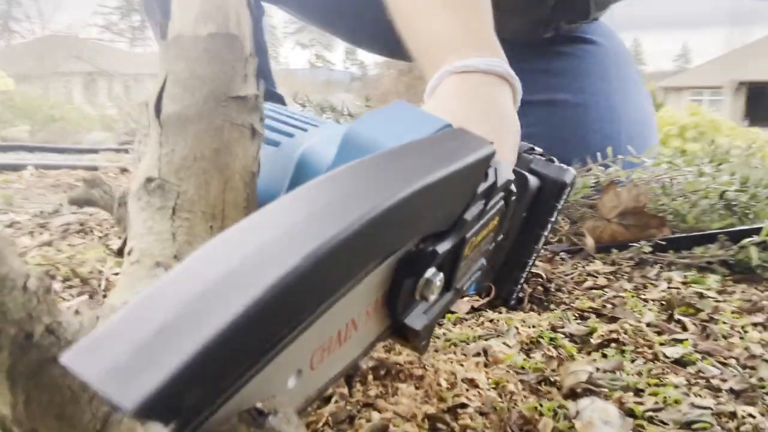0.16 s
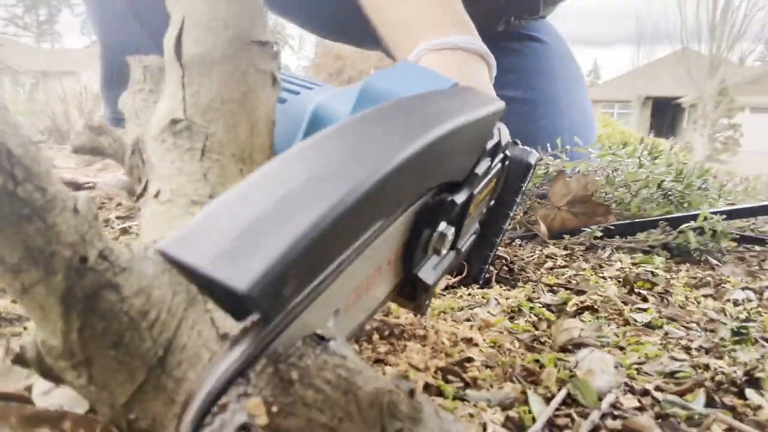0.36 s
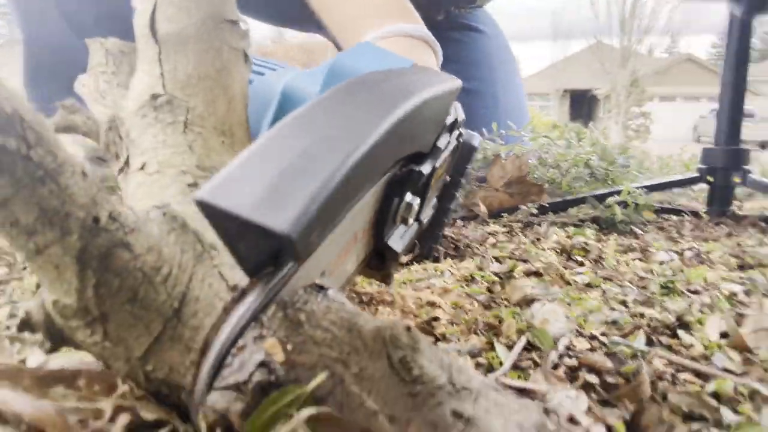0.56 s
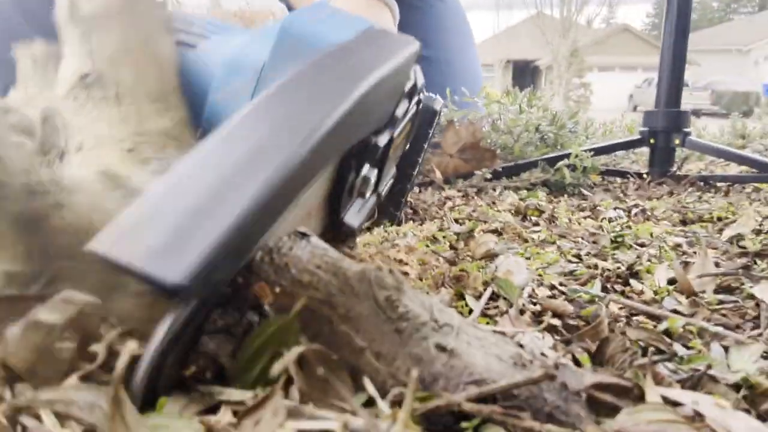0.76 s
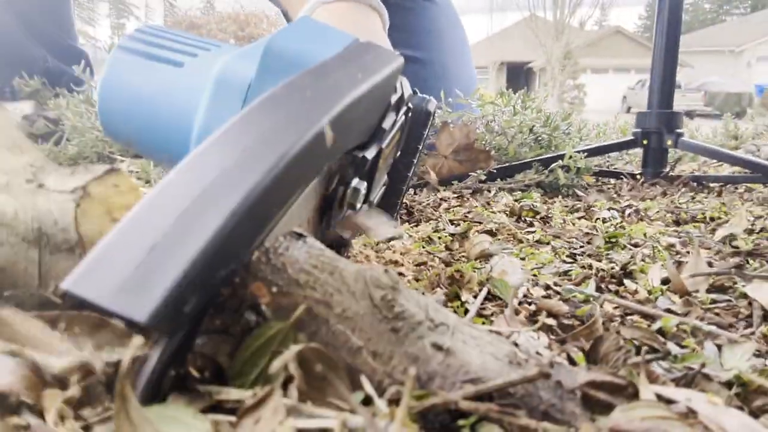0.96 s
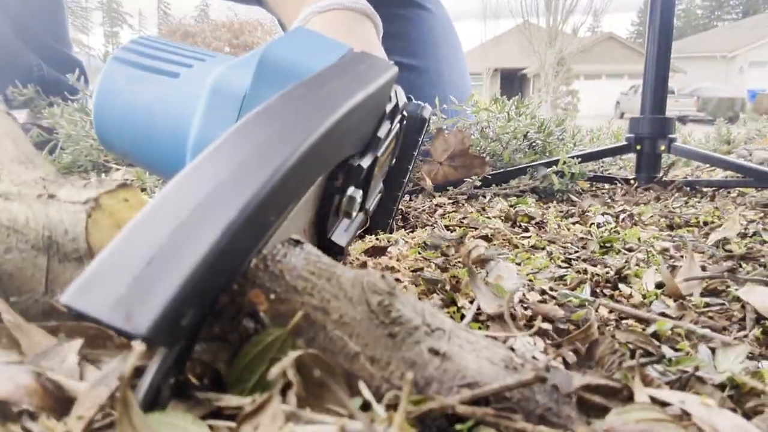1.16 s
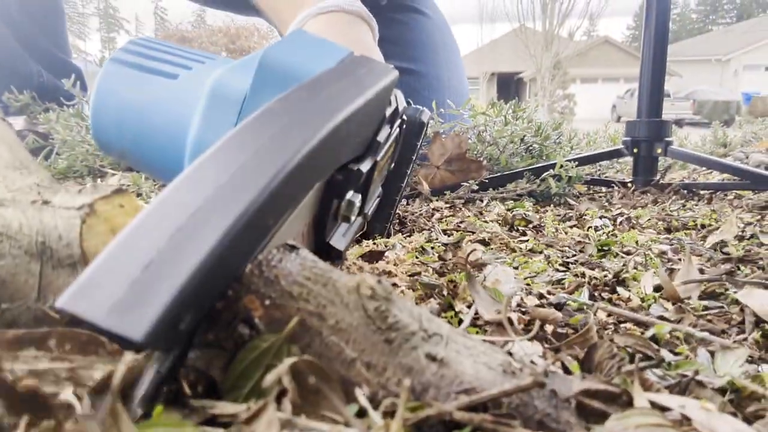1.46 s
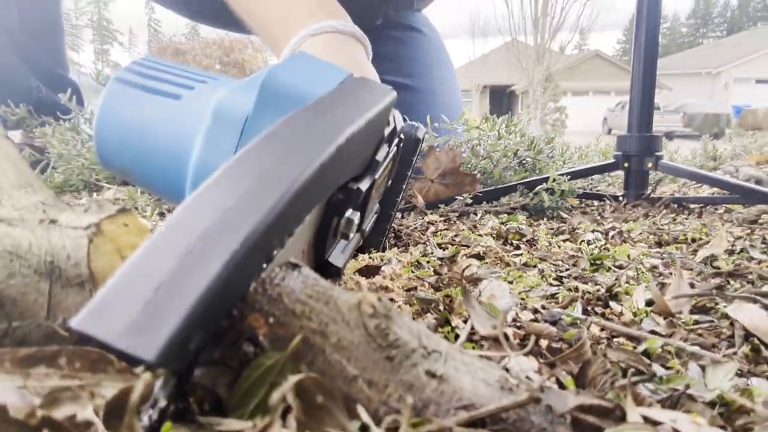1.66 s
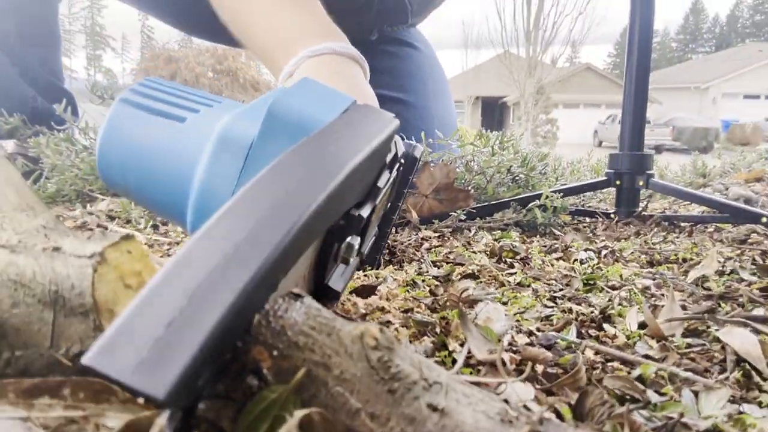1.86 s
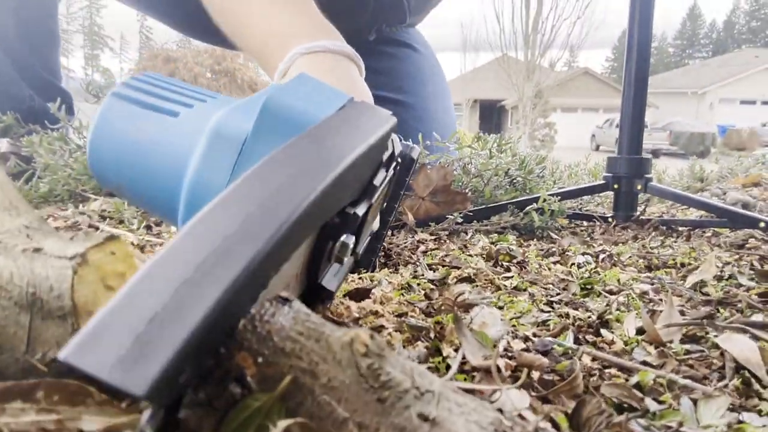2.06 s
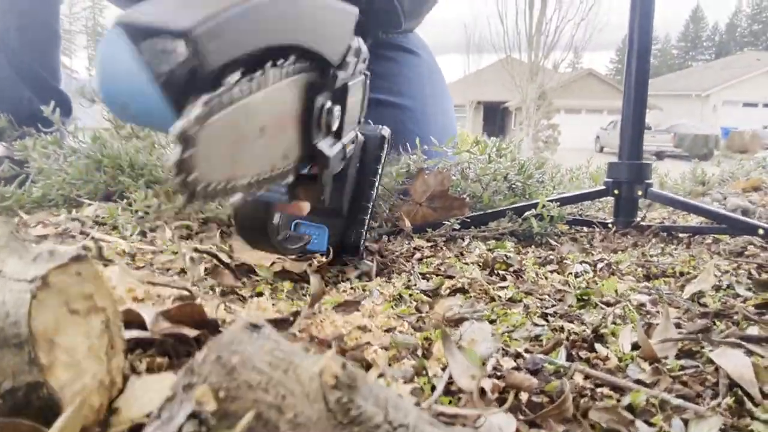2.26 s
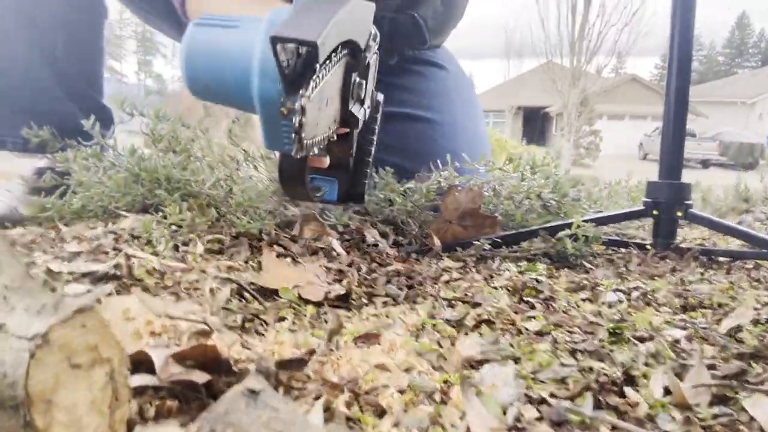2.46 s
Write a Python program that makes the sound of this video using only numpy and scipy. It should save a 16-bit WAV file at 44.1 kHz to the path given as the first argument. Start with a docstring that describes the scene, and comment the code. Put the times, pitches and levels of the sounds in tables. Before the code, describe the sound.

A small battery chainsaw runs very close outdoors, a dense chain rasp with whine and loose guard rattle. Around 0.7-0.85 s the teeth grab: woody thumps, cracks and judder, the pitch dipping then recovering higher. It whines freely until 1.5 s, slows rapidly and clacks silent near 1.65 s. Quiet leaf rustles, gritty scrapes and twig ticks follow, sharpest near 2.24 s, over faint low air.

```python
"""Small chainsaw cutting a dead branch

A cordless chainsaw runs close by, low over dry leaves: link slaps merge into a rasp, sprocket and motor
whine as sines tied to chain speed, and the loose guard rattles as ringing modes.
As the teeth grab, modal thumps, cracks and judder sound and the speed dips; breaking through recolours the rasp.
The chain slows and falls silent; filtered specks and noise bursts make leaves, scrapes and twigs over faint air.
"""
import sys
import numpy as np
from scipy import signal
from scipy.fft import rfft, irfft, next_fast_len
from scipy.io import wavfile
from scipy.ndimage import map_coordinates

SR = 44100
rng = np.random.default_rng(int(sys.argv[2]) if len(sys.argv) > 2 else 0)


def wav_record(signal):
    """Record a signal, one row per channel, as 16-bit PCM in the file named by sys.argv[1]."""
    frames = np.transpose(np.atleast_2d(signal))
    bounded = np.clip(frames, -1, 1)
    # unit amplitude maps onto the largest positive 16-bit level
    quanta = np.round(bounded * 32767).astype(np.int16)
    wavfile.write(sys.argv[1], SR, quanta)


N = 114660


def amp(db):
    """Amplitude of a level in dB."""
    return 10 ** (np.asarray(db) / 20)


def unit(x):
    """Scale to rms 1."""
    return x / np.sqrt(np.mean(x ** 2) + 1e-20)


def along(points, hz):
    """Each column of (frequency [Hz], ..) points, interpolated on a log frequency axis."""
    f, *cols = np.transpose(points)
    return np.array([np.interp(np.log(hz + 1), np.log(f + 1), c) for c in cols])


def curves(rows):
    """One value per sample for each column after the time."""
    s, *cols = np.transpose(rows)
    return [np.interp(np.arange(N) / SR, s, c) for c in cols]


def wobble(knots_per_s):
    """A smooth random curve through normal-distributed knots."""
    position = np.arange(N) * knots_per_s / SR
    return map_coordinates(rng.standard_normal(N), [position], mode="wrap")


def filtered(x, response):
    """x times a response of frequency, via a zero-padded FFT."""
    m = next_fast_len(N + SR // 2)
    return irfft(rfft(x, m) * response(np.fft.rfftfreq(m, 1 / SR)), m)[..., :N]


# left-right likeness: (frequency [Hz], correlation [0..1])
LIKENESS = [(150, 0.87), (1700, 0.22), (3000, 0.23), (15000, .1)]


def coloured(pair, spectrum):
    """Blend two unrelated signals to the left-right likeness and a spectrum, at rms 1."""
    def mid_side_gains(hz):
        angle = np.arccos(np.clip(along(LIKENESS, hz)[0], -1, 1)) / 2
        return np.array([np.cos(angle), np.sin(angle)])

    mid, side = filtered(pair, mid_side_gains)
    stereo = np.array([mid + side, mid - side])
    return unit(filtered(stereo, lambda hz: amp(along(spectrum, hz))))


def noise():
    """Two unrelated white noises."""
    return rng.standard_normal((2, N))


def specks(rate_per_s):
    """Tiny impacts at random moments, rms 1."""
    return unit(np.tanh(noise()) * (rng.random(N) < rate_per_s / SR))


def pan(db):
    """Left and right gains for a left-minus-right difference in dB."""
    return amp([[db / 2], [-db / 2]])


def add(track, s, sound):
    """Mix a sound into a track at s seconds."""
    part = track[..., round(s * SR):][..., :sound.shape[-1]]
    part += sound[..., :part.shape[-1]]


def ring(modes):
    """One blow on a body: decaying sine modes, strength and pitch varying a little."""
    t = np.arange(SR // 4) / SR
    out = np.zeros(len(t))
    for hz, db, t60_s in modes:
        envelope = amp(db + rng.normal(0, 2) - 60 * t / t60_s)
        out += envelope * np.sin(2 * np.pi * hz * rng.normal(1, .02) * t)
    return out


def crack(hz, decay_s):
    """A short decaying noise burst in a broad band, partly shared left and right, peak 1."""
    t = np.arange(SR // 20) / SR
    edges_hz = np.clip([hz / 1.8, hz * 1.64], 50, SR / 2.1)
    b, a = signal.butter(2, edges_hz, "bandpass", fs=SR)
    hiss = rng.standard_normal(len(t)) + 1.1 * rng.standard_normal((2, len(t)))
    burst = signal.lfilter(b, a, hiss * np.exp(-t / decay_s))
    return burst / np.abs(burst).max()


def low_cut(x):
    """Thin wood radiates little bass."""
    return signal.sosfilt(signal.butter(4, 125, "highpass", fs=SR, output="sos"), x)


# chain speed before jitter: (time [s], speed [links/s])
CHAIN_SPEED = [(0, 312), (.67, 312), (.73, 274), (.79, 252), (.85, 273), (.9, 306), (.965, 323),
               (1.52, 322), (1.6, 160), (1.655, 65)]
SPEED_JITTER = .005  # fraction of the speed


def chain_travel():
    """Links passed so far: the integral of the slightly unsteady chain speed."""
    speed, = curves(CHAIN_SPEED)
    return np.cumsum(speed * (1 + SPEED_JITTER * wobble(60))) / SR


# clatter level: (time [s], level [dB])
CLATTER_LEVEL = [(0, -27), (.25, -27.5), (.68, -26), (.85, -28), (1.52, -28), (1.62, -34.5), (1.66, -42),
                 (1.68, -73), (1.72, -100)]
# chain and bar colour: (frequency [Hz], cutting left [rel dB], cutting right [rel dB],
# free left [rel dB], free right [rel dB])
CHAIN_COLOUR = [(30, -100, -84, -104, -102), (220, -110.5, -84, -97.5, -85.5),
                (547, -69.5, -71, -73, -71.5), (770, -73.5, -70.5, -88.5, -76),
                (1040, -68, -70.5, -69.5, -72), (1836, -69.5, -64, -72.5, -66),
                (2400, -71.5, -68, -67, -69.5), (3100, -72, -70.5, -72.5, -68.5),
                (3150, -73.5, -61.5, -71, -69.5), (5970, -75.5, -69.5, -75, -69.5),
                (6500, -74.5, -62.5, -79.5, -62.5), (7240, -76, -73.5, -73.5, -76.5),
                (8070, -73, -63, -72, -67.5), (10050, -74.5, -71.5, -77.5, -75.5),
                (11700, -71, -61, -74, -64.5), (14400, -77, -60.5, -74.5, -63.5),
                (15560, -85, -66, -79.5, -65.5)]
THROUGH_S, TURN_S = .74, .033  # breaking through: midpoint and length of the colour change
LINK_DECAY_S, LINK_SCATTER_DB, LINK_TIMING_LINKS = .0066, 2, .049
TICKS_PER_S, TICK_DB = 1500, -6  # rivets on the bar, against the hiss
FLUTTER_DB, FLUTTER_KNOTS_PER_S = .15, 55  # chain flapping


def chain(links):
    """Every link slaps the bar in a short burst; at speed the bursts merge into a rasping hiss."""
    t = np.arange(N) / SR
    draws = rng.standard_normal((N // 50, 2))[:int(links[-1])]
    slap_links = np.arange(len(draws)) + LINK_TIMING_LINKS * draws[:, 0]
    slap_samples = np.interp(slap_links, links, np.arange(N)).astype(int)
    slaps = np.bincount(slap_samples, amp(LINK_SCATTER_DB * draws[:, 1]) ** 2, N)
    energy = signal.lfilter([1], [1, -np.exp(-2 / (LINK_DECAY_S * SR))], slaps)
    bursts = np.sqrt(energy / energy[t < 1].mean())

    grain = noise() + amp(TICK_DB) * specks(TICKS_PER_S)
    rasp = grain * bursts * amp(FLUTTER_DB * wobble(FLUTTER_KNOTS_PER_S))
    cutting = coloured(rasp, [row[:3] for row in CHAIN_COLOUR])
    running_free = coloured(rasp, [(row[0], *row[3:]) for row in CHAIN_COLOUR])
    free = np.clip((t - THROUGH_S) / TURN_S + .5, 0, 1)
    level_db, = curves(CLATTER_LEVEL)
    return amp(level_db) * ((1 - free) * cutting + free * running_free)


HOUSING_RIPPLE_DB, HOUSING_SPACING_HZ = 2.97, 70.3


def housing(x):
    """Many small fixed resonances of bar and guard, different left and right, fading in over 1-3 kHz."""
    knots = rng.standard_normal((2, 1024))

    def response(hz):
        ripple = np.array([map_coordinates(k, [hz / HOUSING_SPACING_HZ], mode="wrap") for k in knots])
        return amp(HOUSING_RIPPLE_DB * ripple * np.clip(hz / 2000 - .5, 0, 1))

    return filtered(x, response)


# whine before waver and pan: (time [s], link rate [dB], twice it [dB], three times it [dB])
WHINE_LEVEL = [(0, -68, -51.5, -64), (.3, -55, -47.5, -46.5), (.5, -61, -46.5, -47), (.58, -58, -49, -42),
               (.66, -75, -52, -44.5), (.7, -45, -67, -52), (.85, -53, -42.5, -56),
               (.95, -50.5, -38.5, -53), (1.12, -53.5, -49, -54), (1.52, -61.5, -47, -51.5),
               (1.58, -66, -52.5, -69), (1.62, -88, -62.5, -89)]
# upper lines: (multiple of link rate [-], level against the third [dB])
UPPER_LINES = [(4, -6), (5, -7)]
MOTOR_RATIO, MOTOR_DB = 2.54, -9  # multiple of the link rate; level against the third
WAVER_DB, RASP_DB, WHINE_PAN_DB = 1.44, 2.5, 2  # slow and fast roughness; left minus right
WHINE_END_S, WHINE_FADE_S = 1.62, .058


def whine(links):
    """The sprocket sings at multiples of the link rate, the motor faintly between; it fades on braking."""
    first, second, third = curves(WHINE_LEVEL)
    lines = [(1, first), (2, second), (3, third), (MOTOR_RATIO, third + MOTOR_DB)]
    lines += [(multiple, third + db) for multiple, db in UPPER_LINES]
    tone = np.zeros(N)
    for multiple, db in lines:
        level = amp(db + WAVER_DB * wobble(35.67) + RASP_DB * wobble(150))
        tone += level * np.sin(2 * np.pi * (multiple * links + rng.random()))
    fade = np.clip((WHINE_END_S - np.arange(N) / SR) / WHINE_FADE_S, 0, 1)
    return np.sqrt(2) * tone * pan(WHINE_PAN_DB) * fade  # sqrt 2: sine rms to peak


# loose chain guard: (frequency [Hz], mode level [rel dB], t60 [s])
GUARD_MODES = [(1000, -1, 0.022), (1652, -1.5, 0.045), (1930, -4, 0.038)]
GUARD_LOW_HZ = 600  # thin plastic radiates no bass
KNOCKS_PER_S, RATTLE_DB, RATTLE_SCATTER_DB = 70, -9.5, 2.5  # RATTLE_DB is against the clatter level


def rattle():
    """The loose guard knocks the bar at irregular moments, its level following the chain clatter."""
    out = np.zeros(N)
    count = round(KNOCKS_PER_S * CHAIN_SPEED[-1][0])
    for k, (offset, size) in enumerate(rng.standard_normal((count, 2))):
        add(out, abs(k + offset) / KNOCKS_PER_S, amp(RATTLE_SCATTER_DB * size) * ring(GUARD_MODES))
    level_db, = curves(CLATTER_LEVEL)
    high_pass = signal.butter(2, GUARD_LOW_HZ, "highpass", fs=SR, output="sos")
    return amp(level_db + RATTLE_DB) * signal.sosfilt(high_pass, out)


# teeth grabbing: (time [s], thump before GRAB_DB [rel dB], splintering crack before low cut and pan [dB])
TOOTH_GRABS = [(0.688, -16, -23.5), (.7, -18, -18), (0.722, -16, -25), (0.735, -13, -26), (.739, -17, -23),
               (.755, -15.5, -41), (.78, -9, -30), (.784, -13, -20), (.793, -16.5, -18.5),
               (.799, -12.5, -18), (.817, -18.5, -22), (.83, -17, -27), (.839, -8.5, -31)]
# branch and saw body: (frequency [Hz], mode level [rel dB], t60 [s])
WOOD_MODES = [(145, -5.5, 0.068), (230.7, -4.5, 0.03), (305, -1, 0.021), (411, 0.5, 0.038),
              (717, -17, 0.08), (972, -3.5, 0.064)]
# judder between grabs, before pan: (time [s], level [dB])
JUDDER_LEVEL = [(.665, -57.5), (.684, -41), (.738, -32), (.77, -32.5), (.794, -25), (.82, -30),
                (.84, -27.5), (.85, -38), (.93, -70.5)]
# judder spectrum: (frequency [Hz], level [rel dB])
JUDDER_SPECTRUM = [(30, -36.5), (130, -8), (300, -1), (600, -8), (1100, -14), (4000, -31.5)]
GRAB_DB, GRAB_PAN_DB = -13.5, -4.5
CRACK_HZ, CRACK_DECAY_S = 830, .0021  # splintering fibres


def bite():
    """The teeth catch in the wood: modal thumps of branch and saw, fibre cracks and speckled judder."""
    knocks = np.zeros((2, N))
    for s, thump_db, crack_db in TOOTH_GRABS:
        add(knocks, s, amp(thump_db + GRAB_DB) * ring(WOOD_MODES))
        add(knocks, s, amp(crack_db) * crack(CRACK_HZ, CRACK_DECAY_S))
    level_db, = curves(JUDDER_LEVEL)
    judder = amp(level_db) * coloured(specks(2300), JUDDER_SPECTRUM)
    return (low_cut(knocks) + judder) * pan(GRAB_PAN_DB)


LEFT_LAG_S = .0001  # the saw is to the right


def saw():
    """One chain travel drives both whine and clatter; the whole saw arrives later on the left."""
    links = chain_travel()
    sound = whine(links) + housing(chain(links)) + rattle() + bite()
    side = np.array([[1], [-1]])
    return filtered(sound, lambda hz: np.exp(-1j * np.pi * hz * LEFT_LAG_S * side))


# dry leaves: (time [s], level [dB])
RUSTLE_LEVEL = [(1.73, -72.5), (1.775, -65), (1.89, -65.5), (1.93, -73.5), (2.04, -73), (2.08, -66),
                (2.22, -62.5), (2.26, -65), (2.345, -63), (2.37, -75), (2.6, -81)]
# leaf spectrum: (frequency [Hz], left [rel dB], right [rel dB])
LEAF_COLOUR = [(100, -19, -15.5), (900, 6.5, -5), (2300, -4, 5), (6470, -12, -6), (10000, -11, -11),
               (14000, -16, -1)]
LEAF_SPECKS_PER_S, LEAF_HISS_DB, LEAF_CLUMP_DB = 600, 1.5, 2.5  # hiss is against the specks


def leaves():
    """Dry leaves crackle and brush as the saw is drawn out: specks and hiss in random clumps."""
    level_db, = curves(RUSTLE_LEVEL)
    crackle = specks(LEAF_SPECKS_PER_S) + amp(LEAF_HISS_DB) * noise()
    clumps = amp(LEAF_CLUMP_DB * wobble(280))
    return amp(level_db) * coloured(crackle * clumps, LEAF_COLOUR)


# bar strokes: (time [s], length [s], level at mid-stroke before pan [dB])
SCRAPE_STROKES = [(2.079, 0.035, -62), (2.112, 0.14, -70.5), (2.322, 0.026, -63.5)]
# scrape spectrum: (frequency [Hz], level [rel dB])
SCRAPE_SPECTRUM = [(500, -6), (1200, -4), (2300, 3), (3800, -12), (5200, -19), (12000, -26)]
SCRAPE_PAN_DB = -15


def scrapes():
    """The chain drags over the cut face in short gritty strokes of clumped specks."""
    t = np.arange(N) / SR
    strokes = np.zeros(N)
    for s, length_s, db in SCRAPE_STROKES:
        swell = np.sin(np.pi * np.clip((t - s) / length_s, 0, 1))
        strokes += amp(db) * np.sqrt(np.abs(swell))
    grit = unit(specks(2900) * amp(2.9 * wobble(400)))
    return strokes * coloured(grit, SCRAPE_SPECTRUM) * pan(SCRAPE_PAN_DB)


# twigs snapping and small knocks: (time [s], peak before pan [dB], nominal centre [Hz], # decay [s], left minus
# right [dB])
TWIG_SNAPS = [(1.651, -36, 1840, 0.0085, -2.5), (1.739, -53, 6030, 0.0006, -14),
              (1.815, -48, 13000, 0.00077, -8), (1.828, -61, 5300, 0.0018, -7),
              (1.89, -48, 2590, 0.0017, -2), (2.036, -49, 5550, 0.00085, 11),
              (2.058, -45.5, 4900, 0.0012, -11), (2.112, -46.5, 2460, .0015, -14),
              (2.185, -52, 1590, 0.0027, -22), (2.214, -48, 2800, 0.0021, -14),
              (2.235, -33.5, 4700, 0.00088, 10), (2.281, -56, 2290, 0.0024, -13),
              (2.3244, -46.5, 2700, 0.0017, -13), (2.331, -49, 2800, .0012, -15),
              (2.34, -51, 2720, 0.0017, -10), (2.565, -56.5, 2200, .001, -8)]


def twigs():
    """Twigs snap and tick, the first while the chain is still slowing: short noise bursts."""
    out = np.zeros((2, N))
    for s, db, hz, decay_s, side_db in TWIG_SNAPS:
        add(out, s, amp(db) * pan(side_db) * crack(hz, decay_s))
    return out


# grab, squeak, brush: (time [s], length [s], level at mid-swell [dB], centre [Hz], half-width [octaves])
SOFT_SWELLS = [(0.427, 0.033, -45, 380, 0.62), (1.79, 0.16, -71.5, 885, .15),
               (2.485, .13, -68.5, 477, 0.48)]


def soft_swells():
    """Brief hollow swells of band-limited noise: a small grab, a faint squeak, a late soft brush."""
    t, out = np.arange(N) / SR, np.zeros(N)
    for s, length_s, db, centre_hz, width_oct in SOFT_SWELLS:
        def band(hz):
            return np.exp(-.5 * (np.log2((hz + 1) / centre_hz) / width_oct) ** 2)

        swell = unit(filtered(rng.standard_normal(N), band))
        out += amp(db) * swell * np.sin(np.pi * np.clip((t - s) / length_s, 0, 1))
    return out


# bar bumping the branch: (time [s], gain on the modes [dB])
BAR_BUMPS = [(2.236, -45)]
# bar on branch: (frequency [Hz], mode level [rel dB], t60 [s])
BUMP_MODES = [(142, -7, 0.086), (496, -6, .022), (760, 5, 0.0058), (1280, -6, 0.019)]
# soft ground thuds: (time [s], gain on the modes [dB])
GROUND_THUDS = [(.847, -37), (2.246, -58), (2.36, -54)]
# soft ground: (frequency [Hz], mode level [rel dB], t60 [s])
GROUND_MODES = [(81, -14, 0.13), (145, 2, 0.14)]


def bumps():
    """The bar knocks the branch and soft thuds sound on the ground: struck modes."""
    out = np.zeros(N)
    for s, db in BAR_BUMPS:
        add(out, s, amp(db) * low_cut(ring(BUMP_MODES)))
    for s, db in GROUND_THUDS:
        add(out, s, amp(db) * ring(GROUND_MODES))
    return out


# outdoor background: (time [s], level [dB])
AIR_CURVE = [(0, -80), (2, -73), (2.6, -63.5)]
# outdoor spectrum: (frequency [Hz], level [rel dB])
AIR_SPECTRUM = [(20, -37), (55, 7), (150, 2), (800, -19), (6000, -30), (15000, -38)]


def air():
    """The low murmur of the open air: bass-heavy noise."""
    level_db, = curves(AIR_CURVE)
    return amp(level_db) * coloured(noise(), AIR_SPECTRUM)


def scene():
    """The saw with leaves, twigs, branch contacts and soft swells, over the open air."""
    return saw() + leaves() + scrapes() + twigs() + soft_swells() + bumps() + air()


TOP_HZ = 15800


def record(dry):
    """A very steep low-pass: almost nothing is kept above the band limit."""
    return filtered(dry, lambda hz: 1 / np.sqrt(1 + (hz / TOP_HZ) ** 600))


dry = scene()
out = record(dry)
wav_record(out)
```